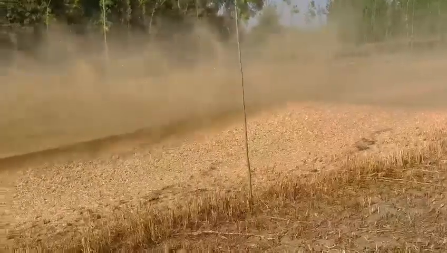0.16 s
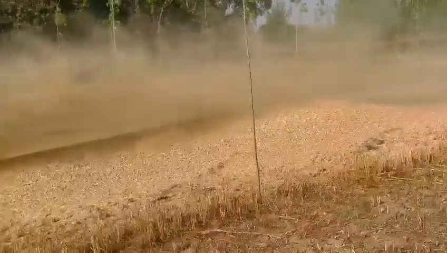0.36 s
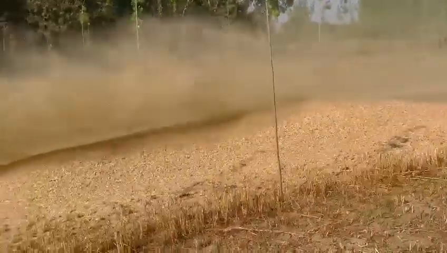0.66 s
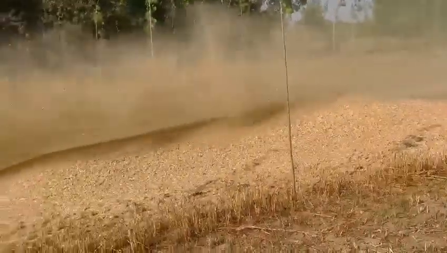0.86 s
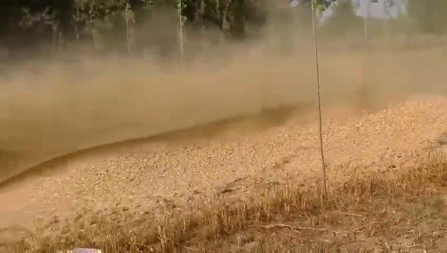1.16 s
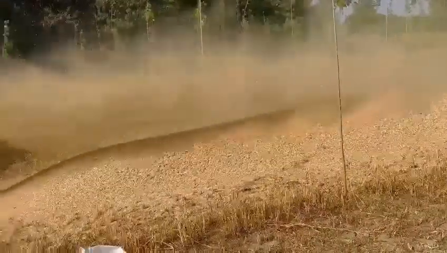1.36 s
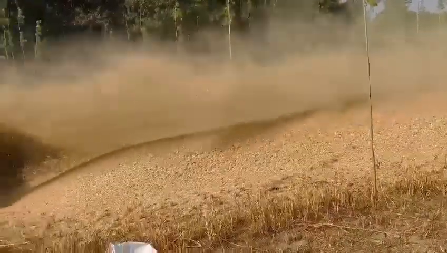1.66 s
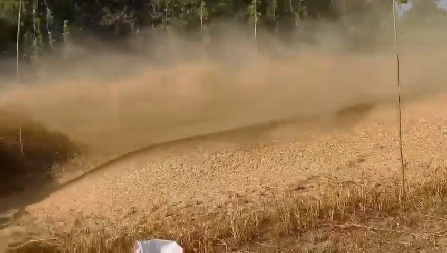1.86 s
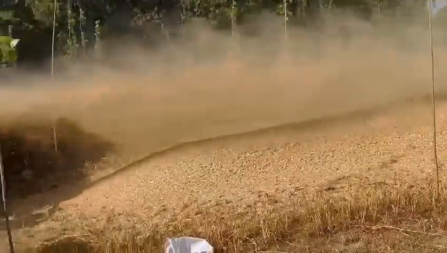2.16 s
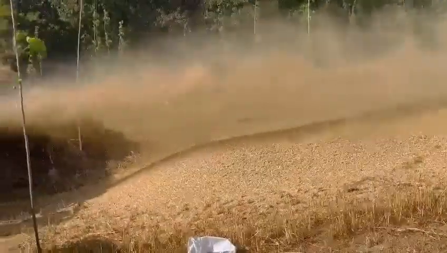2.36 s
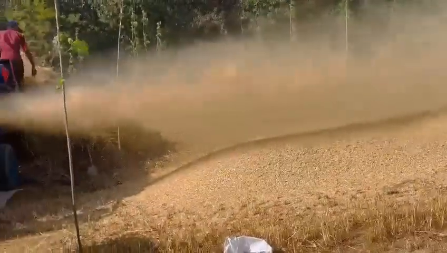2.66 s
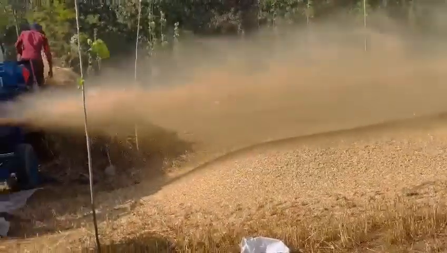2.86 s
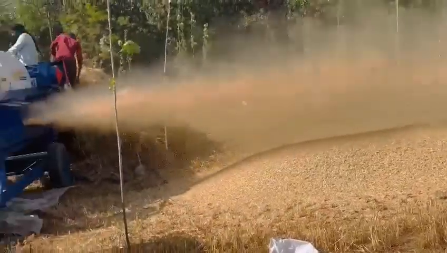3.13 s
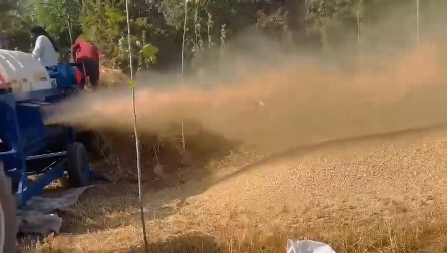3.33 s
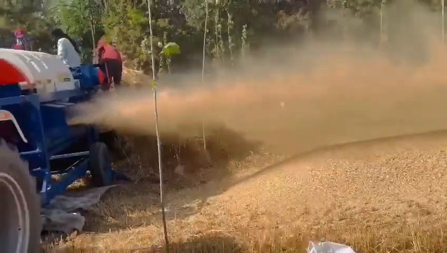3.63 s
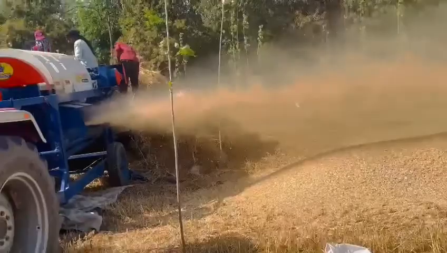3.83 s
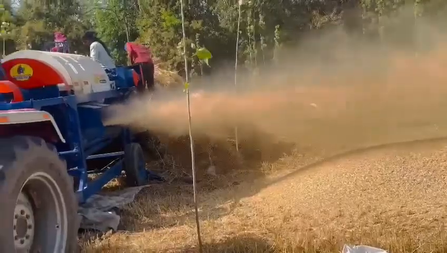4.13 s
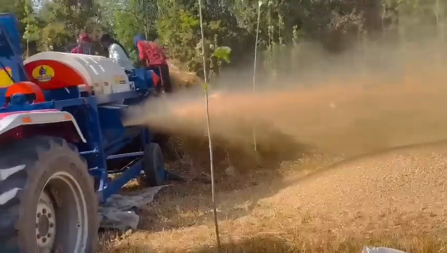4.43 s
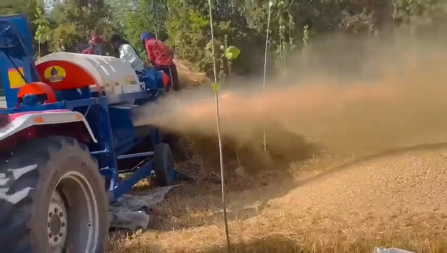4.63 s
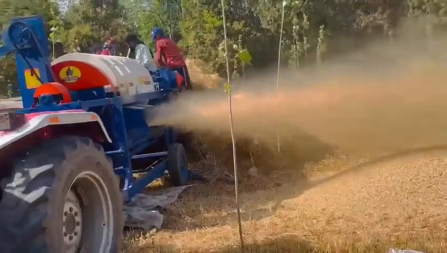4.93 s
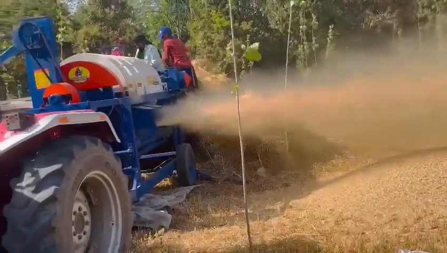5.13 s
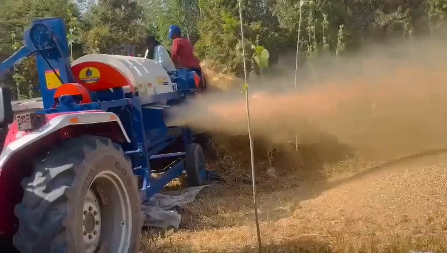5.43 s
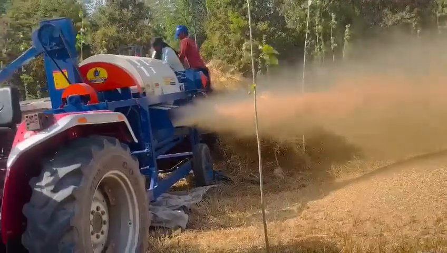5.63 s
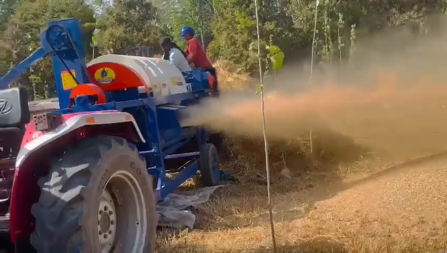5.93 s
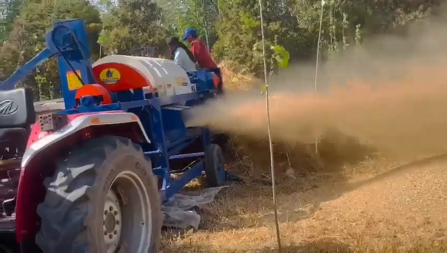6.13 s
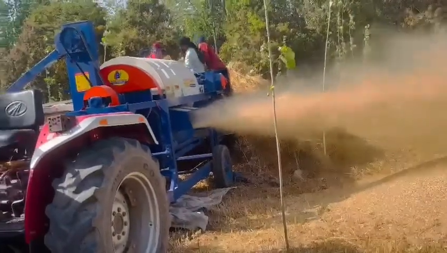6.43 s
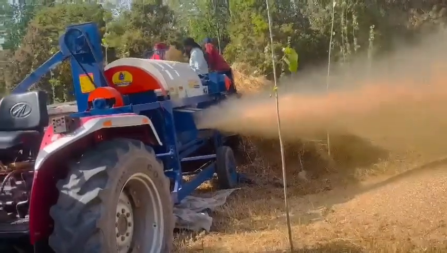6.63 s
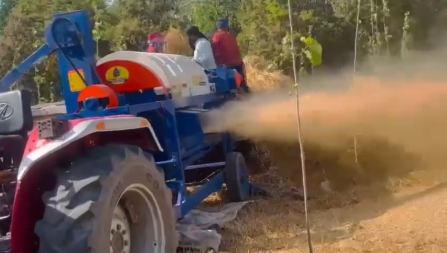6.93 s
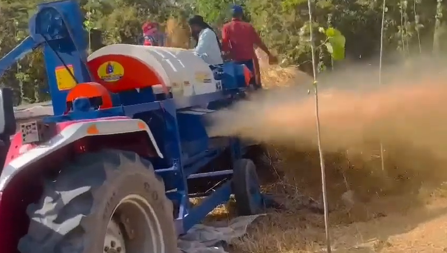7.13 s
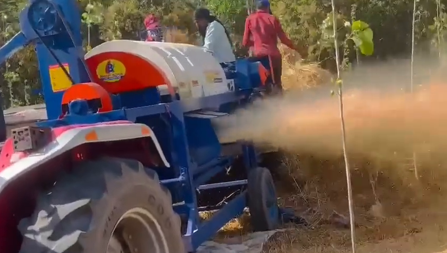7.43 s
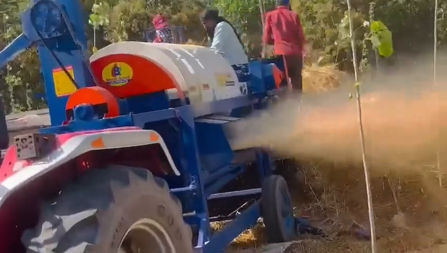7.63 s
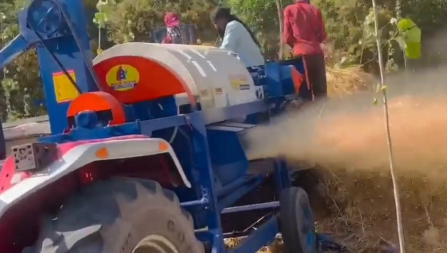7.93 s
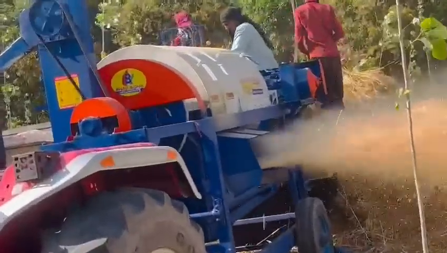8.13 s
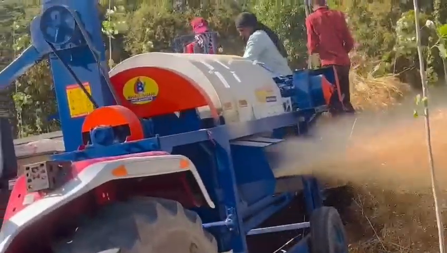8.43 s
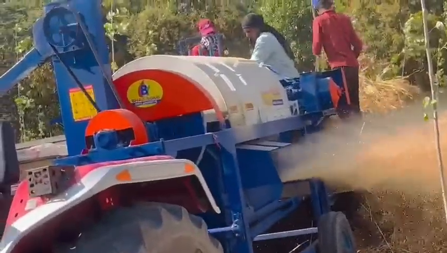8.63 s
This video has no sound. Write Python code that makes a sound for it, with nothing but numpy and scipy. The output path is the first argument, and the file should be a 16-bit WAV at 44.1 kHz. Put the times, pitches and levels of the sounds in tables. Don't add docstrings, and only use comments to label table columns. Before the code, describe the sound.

Dense continuous farm machinery din: low diesel drone, rattling fast knocks, blower hiss spitting straw, a mid-load gear whine, and lumpy low wind gusts.

```python
import sys
import numpy as np
from scipy import signal
from scipy.fft import rfft, irfft, next_fast_len
from scipy.io import wavfile
from scipy.ndimage import uniform_filter1d, map_coordinates

SR = 44100
rng = np.random.default_rng(int(sys.argv[2]) if len(sys.argv) > 2 else 0)


def undo_db(level):
    steps = np.asarray(level, float) / 20
    return 10 ** steps


def output_pcm(signal):
    pcm = np.clip(np.atleast_2d(signal).T, -1, 1) * 32767
    wavfile.write(sys.argv[1], SR, np.round(pcm).astype(np.int16))


N = 387198

# [t/s, firing rate/Hz]
ENGINE_SPEED = [(0.0, 55.032), (0.49, 55.139), (0.98, 54.491), (1.46, 54.56), (1.95, 55.093),
                (2.44, 54.925), (2.93, 53.626), (3.41, 53.185), (3.9, 53.193), (4.39, 53.282),
                (4.88, 53.659), (5.37, 54.187), (5.85, 54.323), (6.34, 54.847), (6.83, 55.266),
                (7.32, 55.256), (7.8, 54.875), (8.29, 54.27)]
# [f/Hz, right over left/dB, phase by which left leads/rad, likeness 0-1]
MIC_PORTS = [(40, 0, 0, .99), (170, -1.2, .24, .88), (750, -3.5, .85, .84), (1150, -1, 1.45, .66),
             (1460, 8, 2.3, .78), (1630, 7.5, 3, .8), (1665, 7, .1, .85), (2100, 8, .5, .75),
             (2500, 2.4, .4, .85), (3200, 0, 0, .93), (6300, 0, 0, .9), (8000, 0, -3.14, .9),
             (9000, 0, -3.14, .9), (10900, 0, -6.28, .9)]


def unit(x):
    return x / np.sqrt(np.mean(x ** 2) + 1e-20)


def along(points, hz, axis=1):
    columns = np.transpose(points)
    return np.interp(np.log(hz + 1), np.log(columns[0] + 1), columns[axis])


def curve(rows):
    times, values = np.transpose(rows)
    return np.interp(np.arange(N) / SR, times, values)


def wobble(rate):
    knots = rng.standard_normal(int(N * rate / SR) + 4)
    return map_coordinates(knots, [np.arange(N) * rate / SR])


def filtered(x, response):
    size = next_fast_len(N + SR // 2)
    spectrum = rfft(x, size) * response(np.fft.rfftfreq(size, 1 / SR))
    return irfft(spectrum, size)[..., :N]


def patchy(depth_db):
    z = signal.stft(rng.standard_normal((2, N)), nperseg=512)[2]
    patches = rng.standard_normal(z.shape[1:])
    patches = uniform_filter1d(patches, size=6, axis=0)
    patches = uniform_filter1d(patches, size=12, axis=1)
    return signal.istft(z * undo_db(depth_db * unit(patches)), nperseg=512)[1][:, :N]


def spread(pair, colour):
    def shares(hz):
        angle = np.arccos(np.clip(along(MIC_PORTS, hz, axis=3), 0, 1)) / 2
        return colour(hz) * [np.cos(angle), np.sin(angle)]

    mid, side = filtered(pair, shares)
    return unit(np.array([mid + side, mid - side]))


def level(rest_db, per_load_db, facing_share):
    # [t/s, gain/dB]
    facing = [
        (0, -1),
        (.8, -0.5),
        (2.3, 1.5),
        (2.9, 3),
        (4.2, 4),
        (5.2, 3.5),
        (6.2, 2.5),
        (7.6, 2),
        (8.2, 3),
        (8.78, 3.5),
    ]
    free_rate = 55.3
    load = free_rate - curve(ENGINE_SPEED)
    return rest_db + per_load_db * load + facing_share * curve(facing)


def spells(rows):
    t = np.arange(N) / SR
    swell_s = 0.15
    total_db = 0
    for start, length, db in rows:
        inside = np.minimum(t - start, start + length - t)
        total_db = total_db + db * np.clip(inside / swell_s + .5, 0, 1)
    return total_db


def wind():
    # [t/s, level/dB]
    gusts = [(0, -27.5), (1, -29.5), (2, -28), (2.7, -21.5), (3.1, -22), (3.5, -19.5), (3.75, -22),
             (4.15, -19.5), (4.45, -17.5), (5.2, -27.5), (6, -21), (6.7, -26), (7.1, -22), (7.55, -28.5),
             (8.1, -26), (8.3, -22.5), (8.78, -20)]
    # [f/Hz, level/dB per Hz]
    buffet = [(15, -45), (30, -4), (40, -30), (52, -5.5), (72, -1.5), (100, -9), (150, -12), (300, -18.5),
              (800, -52.5)]
    lumps = undo_db(0.92 * wobble(18) + 2 * wobble(13))
    rumble = spread(patchy(1.0), lambda hz: undo_db(along(buffet, hz)))
    return undo_db(curve(gusts) + 3.5) * unit(lumps * rumble)


def thresher():
    # [f/Hz, level/dB per Hz]
    drum_colour = [(60, -73), (130, -8.5), (200, -3.5), (400, -1.5), (700, -8.5), (1100, -8.5), (1400, -12),
                   (2000, -20), (4000, -56)]
    # [f/Hz, level/dB per Hz]
    straw_colour = [(500, -55), (1300, -1), (1650, -7), (2500, 0.5), (3100, 0), (3800, -1.5), (5000, -3.5),
                    (6000, -7.5), (8000, -8.5), (11000, -14.5), (13000, -28)]
    # [f/Hz, width/Hz, level/dB]
    panels = [(1527, 100, -42), (1720, 10, -49.5), (1850, 12, -53), (1983, 8.4, -56), (2034, 300, -41),
              (2507, 17, -47), (3717, 56, -54.5)]
    # [t/s, level/dB]
    covers_heard = [
        (0, -0.5),
        (1, 2.5),
        (2.4, 1.5),
        (3, 2),
        (4.6, 0),
        (5.4, -3.5),
        (6.5, -2.5),
        (7.5, 1.5),
        (8.78, 1.5),
    ]
    drum_db = level(rest_db=-27.5, per_load_db=0.67, facing_share=0.81)
    blower_db = level(rest_db=-34, per_load_db=.3, facing_share=1.28)
    feed = wobble(7)
    roar = undo_db(drum_db + .5 * feed) * spread(patchy(0.67), lambda hz: undo_db(along(drum_colour, hz)))

    snap_sizes = undo_db(2.5 * rng.exponential(size=N))
    snaps = (rng.random(N) < .004) * snap_sizes * rng.standard_normal((2, N))
    straw = patchy(1.4) + 0.31 * unit(snaps)
    hiss = undo_db(blower_db - 2.0 + 0.63 * feed) * spread(straw, lambda hz: undo_db(along(straw_colour, hz)))

    def metal(f):
        return sum(undo_db(db) / np.sqrt(w) * w / (w + 2j * (f - c)) for c, w, db in panels)

    covers = undo_db(-37) * spread(patchy(1.5), metal)
    return roar + hiss + undo_db(curve(covers_heard)) * covers


def shafts(firings):
    multiples = [1.25, 16, 22.5, 38, 48]
    hum_levels = [-35, -42.5, -48.5, -49.5, -51]
    # [start/s, length/s, extra/dB]
    stands_out = [
        [(0, 5.1, 2.5)],
        [(2.8, 1.6, -7), (6.4, 1.3, 3)],
        [(6.4, 1.3, 6)],
        [(5.3, 0.96, 7), (6.5, 1, 2.5), (7.6, 0.93, 5.5)],
        [(1.4, 1.3, -3)],
    ]
    hum = 0
    for multiple, db, rows in zip(multiples, hum_levels, stands_out):
        strength = undo_db(db + spells(rows) + 1.1 * wobble(8))
        hum = hum + strength * np.cos(2 * np.pi * multiple * firings + .3 * wobble(6))
    return np.sqrt(2) * hum


def gears(firings):
    # [multiple of the firing rate, level/dB]
    mesh = [(24, -2), (32, -0.5), (40, -7)]
    # [start/s, length/s, extra/dB]
    loaded = [
        (2.78, 2.52, 14),
    ]
    # [start/s, length/s, extra/dB]
    chirps = [
        (2.62, 0.38, 12),
        (4.62, 0.52, 6.5),
    ]
    whine_db = -52.5 + spells(loaded)
    top_db = -5.5 + spells(chirps)
    tones = []
    for multiple, db in mesh:
        strength = undo_db(db + 2.1 * wobble(16))
        tones.append(strength * np.cos(2 * np.pi * multiple * firings + 0.62 * wobble(9)))
    return np.sqrt(2) * undo_db(whine_db) * (sum(tones[:-1]) + undo_db(top_db) * tones[-1])


def knock(firings):
    cylinders = [3.5, 5, 6.7, 9]
    # [t/s, extra/dB]
    odd_firings = [(3.058, 1), (3.133, 2), (3.433, -5.5), (3.564, 2), (3.621, 4), (3.828, 1), (4.035, -4),
                   (4.073, 1), (4.148, 3.5), (4.167, 4), (4.41, 1), (4.448, 3.5), (4.56, -4), (5.083, -3.5),
                   (5.157, 2), (5.231, -4)]
    # [f/Hz, width/Hz, level/dB]
    resonances = [(1300, 640, -2), (2460, 304, 1.5), (3690, 500, 0), (5170, 800, -3), (6890, 4400, -8.5),
                  (12020, 7800, -16.5)]
    knock_db = level(rest_db=-40, per_load_db=4.35, facing_share=1.79)
    at = np.flatnonzero(np.diff(np.floor(firings + .14))) + 1
    chance = rng.standard_normal((len(at), 2))
    size_db = np.resize(cylinders, len(at)) + 0.65 * chance[:, 1]
    for s, db in odd_firings:
        size_db[np.argmin(np.abs(at - s * SR))] += db
    blows = np.zeros(N)
    jitter = (15 * chance[:, 0]).astype(int)
    blows[np.clip(at + jitter, 0, N - 1)] = undo_db(size_db)
    u = np.arange(SR // 40) / SR / 0.0022
    bursts = signal.fftconvolve(blows, u * np.exp(-u))[:N] * patchy(1.4)

    def ringing(f):
        total = 0
        for k, (c, w, db) in enumerate(resonances):
            total = total + (-1) ** k * undo_db(db) * 1j * f * w / (c * c - f * f + 1j * f * w)
        return total

    return undo_db(knock_db - 2.5) * spread(bursts, ringing)


def exhaust(firings):
    # [multiple of the firing rate, level/dB, phase/rad]
    overtones = [(.75, -6.5, -0.51), (2, 0, -1.25), (3, 2, .3), (4, -2, 1.3), (5, -10.5, 0), (6, -16.5, 1)]
    # [start/s, length/s, extra/dB]
    turn_away = [
        (5.3, 3, -1.5),
    ]
    first_db = level(rest_db=-22, per_load_db=0.27, facing_share=.3) + spells(turn_away)
    over_db = level(rest_db=-32, per_load_db=1.2, facing_share=0.7)
    angle = 2 * np.pi * firings
    drone = undo_db(first_db + 0.54 * wobble(4)) * np.cos(angle - .5)
    for multiple, db, phase in overtones:
        drone += undo_db(over_db + db + 1.53 * wobble(4.3)) * np.cos(multiple * angle + phase)
    blades = undo_db(-36.5 + 4.5 * wobble(6)) * np.cos(8 * angle + 0.46 * wobble(3))
    return np.sqrt(2) * (drone + blades)


def scene():
    firings = np.cumsum(curve(ENGINE_SPEED)) / SR - .46
    machine = thresher() + shafts(firings) + gears(firings)
    return wind() + machine + knock(firings) + exhaust(firings)


def low_pass(x):
    return signal.sosfilt(signal.butter(12, 12880, fs=SR, output="sos"), x)


def record(dry):
    def right_port(hz):
        notch = 1 - 0.38 / (1 + ((hz - 1650) / 18) ** 2)
        return notch * undo_db(along(MIC_PORTS, hz)) * np.exp(-1j * along(MIC_PORTS, hz, axis=2))

    def edges(hz):
        return 1 / (1 + (hz / 11950) ** 50) / (1 + (28 / (hz + 1)) ** 4)

    pair = np.array([dry[0], filtered(dry[1], right_port)])
    rounded = pair / (1 + np.abs(pair / .84) ** 6) ** (1 / 6)
    mix = filtered(rounded, edges)
    return low_pass(mix)


dry = scene()
out = record(dry)
output_pcm(out)
```